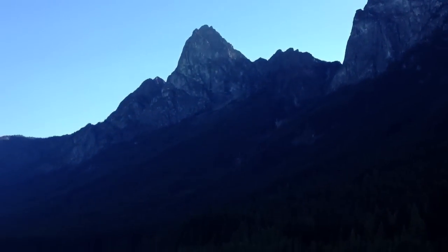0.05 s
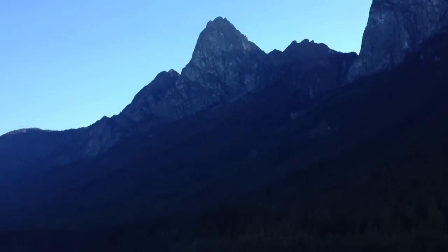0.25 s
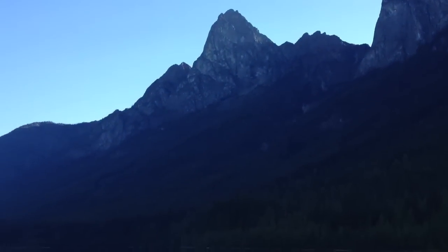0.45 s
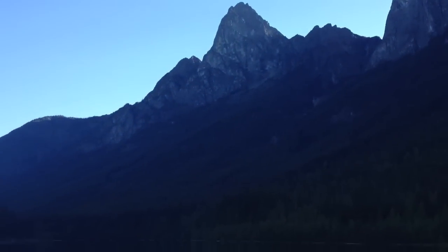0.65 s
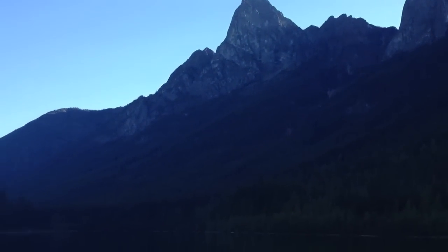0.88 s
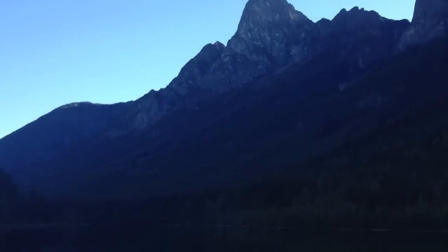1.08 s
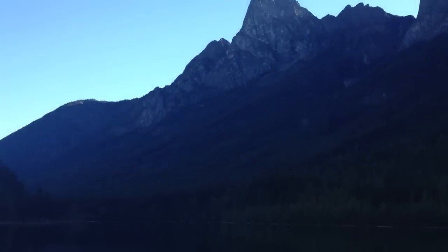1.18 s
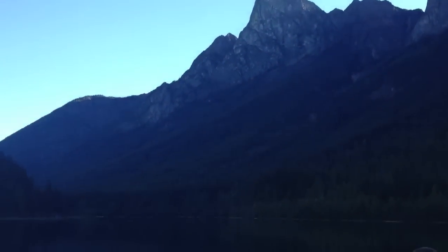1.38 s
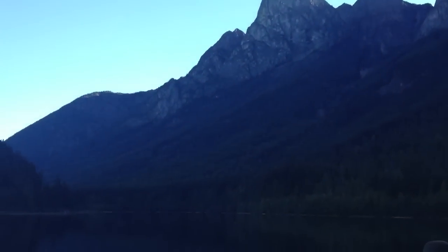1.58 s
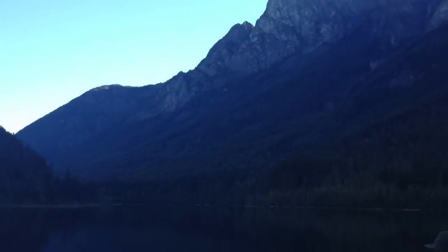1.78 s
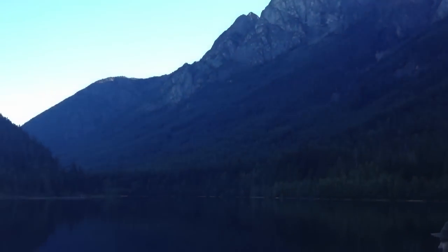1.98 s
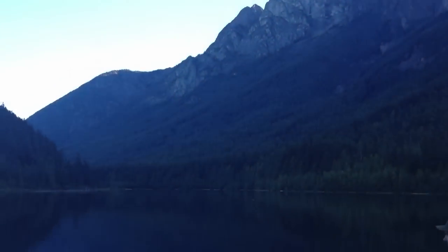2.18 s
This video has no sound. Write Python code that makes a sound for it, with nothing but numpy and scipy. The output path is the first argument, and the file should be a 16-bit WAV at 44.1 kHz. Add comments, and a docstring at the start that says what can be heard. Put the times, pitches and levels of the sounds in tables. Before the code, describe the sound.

A loon calls once across a mountain lake, sliding up at 0.2 seconds, quavering three times on a high, almost pure note and dropping away by 0.75. The shore echoes it immediately, and a faint, dull echo returns from about 1.1 seconds. Close by are tiny handling ticks, a soft swish around 1.6, one sharp click at 1.9 and faint rustles at 2.2. Quiet hiss continues throughout.

```python
"""A mountain lake, one microphone, a steady hiss of quiet air. Out on the water a loon gives one call:
the voice slides up, breaks into a high, almost pure register, quavers three times and drops back.
Trees on the shore echo it at once, the far slopes about a second later. Close to the microphone,
handling makes a few ticks and a soft swish; near the end come one sharp click and faint rustles."""
import sys
import numpy as np
from scipy import signal
from scipy.fft import rfft, irfft
from scipy.io import wavfile
from scipy.ndimage import uniform_filter1d

SR = 44100
rng = np.random.default_rng(int(sys.argv[2]) if len(sys.argv) > 2 else 0)


def wav_out(sig):
    """Save sig, one row per channel (or a flat mono array), as 16-bit PCM at SR to the path in sys.argv[1]."""
    wavfile.write(sys.argv[1], SR, np.round(np.clip(np.atleast_2d(sig).T, -1, 1) * 32767).astype(np.int16))


N = 99225  # 2.25 s


def undb(db):
    """Decibels to gain."""
    return 10 ** (np.asarray(db) / 20)


def wander(rate_hz):
    """Smooth random wander with a spread near 1."""
    hold = max(int(SR / rate_hz), 1)
    steps = np.repeat(rng.standard_normal(N // hold + 1), hold)
    return 1.32 * uniform_filter1d(uniform_filter1d(steps, hold), hold)[:N]


def noise(spectrum, tilt_db=0):
    """Noise of rms 1, shaped by (freq_hz, density_db) points and a tilt per octave."""
    hz, db = np.array(spectrum, float).T
    octave = np.log2(np.maximum(np.fft.rfftfreq(N, 1 / SR), 20))
    shape = undb(np.interp(octave, np.log2(hz), db) + tilt_db * octave)
    x = irfft(rfft(rng.standard_normal(N)) * shape, N)
    return x / x.std()


def glide(t, times, values):
    """Pass smoothly through the points, coming to rest at each crest and dip."""
    span, rise = np.maximum(np.diff(times), 1 / SR), np.diff(values)
    rate = rise / span
    gentler = np.minimum(abs(rate[:-1]), abs(rate[1:]))
    slope = np.r_[0, np.sign(rate[1:]) * gentler * (rate[:-1] * rate[1:] > 0), 0]
    i = np.clip(np.searchsorted(times, t) - 1, 0, len(span) - 1)
    u = np.clip((t - times[i]) / span[i], 0, 1)
    bend = span[i] * u * (1 - u) * ((1 - u) * slope[i] - u * slope[i + 1])
    return values[i] + rise[i] * u * u * (3 - 2 * u) + bend


def low_cut(x, hz):
    """Take away the bass below hz."""
    return signal.sosfilt(signal.butter(2, hz, "highpass", fs=SR, output="sos"), x)


# Quiet air and microphone hiss: freq_hz, density_db
HISS_SPECTRUM = [(30, -5), (60, -24), (125, -5), (210, 0.5), (330, -2), (520, -4), (850, -1.5), (1150, -4),
                 (1700, -5.5), (2700, -10), (4200, -7), (5200, -10), (7000, -10.5), (9500, -14.5),
                 (12500, -9), (15400, -12)]


def hiss(t, level_db=-68.5, flicker_db=0.5, fade_db_per_s=1):
    """The air over the lake and the microphone itself hiss throughout, easing very slightly."""
    gain = undb(level_db - flicker_db * wander(8.5) - fade_db_per_s * (t - t.mean()))
    return gain * noise(HISS_SPECTRUM)


# Throat resonances that colour the overtones: freq_hz, gain_db
THROAT_RESONANCES = [(1700, -1.5), (2000, -5.5), (2950, -18.5), (3350, 2), (3650, -3), (4150, 9.5),
                     (4600, -23), (5300, 11), (6000, -11), (8000, -8)]


def voice(t, course, harmonics_db, rough, jitter=0.0025, shimmer_db=0.7, flutter_db=1.2, waver_hz=251.4):
    """One register of the loon: a wavering tone whose overtones grow with effort and pass the throat."""
    times, hz, db = np.array(course, float).T
    pitch = glide(t, times, hz) * (1 + jitter * rough * wander(waver_hz))
    fullness = 1.27  # above 1, crests are broad and dips narrow
    effort = glide(t, times, undb(db) ** fullness) ** (1 / fullness)
    brightness = (effort / effort.max()) ** 0.49 * undb(flutter_db * wander(waver_hz))
    phase = 2 * np.pi * np.cumsum(pitch) / SR
    tone = undb(harmonics_db[0]) * np.sin(phase)
    for k, overtone_db in enumerate(harmonics_db[1:], 2):
        throat_db = np.interp(k * pitch, *np.array(THROAT_RESONANCES).T)
        tone += brightness * undb(overtone_db + throat_db) * np.sin(k * phase)
    sounding = uniform_filter1d(1. * ((t > times[0]) & (t < times[-1])), size=128)
    return tone * effort * sounding * undb(shimmer_db * rough * wander(waver_hz))


# Course of each part of the call, in order of entry: time_s, pitch_hz, level_db
OPENING_SLIDE = [(.183, 320, -64), (.197, 368, -57.5), (.214, 531, -52.5), (.222, 563, -52),
                 (.226, 600, -80)]
LOW_NOTE = [(.222, 752, -65), (.229, 773.4, -43), (.247, 745, -42.5), (.266, 687.6, -45.5),
            (.291, 799, -41.5), (.313, 834.5, -39.5), (.33, 822, -41.5), (.347, 758, -42), (.356, 786, -76)]
HIGH_QUAVER = [(.349, 990, -100), (.357, 986, -40.5), (.401, 1154, -30.5), (.445, 951.2, -43),
               (.492, 1140, -32), (.543, 935.5, -43.5), (.591, 1063, -36.5), (.632, 925, -45.5),
               (.648, 908, -93)]
SECOND_TONE = [(.352, 755, -51), (.395, 850, -69), (.445, 776, -74), (.49, 830, -76), (.545, 780, -81),
               (.588, 808, -56), (.612, 734, -63), (.628, 690, -72)]
VOICE_BREAK = [(.618, 420.1, -74), (.631, 346.3, -59), (.643, 325, -62), (.662, 363, -71)]
BREAK_SQUEAK = [(.622, 2560, -80), (.635, 2713, -62.5), (.649, 2780, -84)]
CLOSING_NOTE = [(.637, 695, -80), (.645, 667.7, -53), (.666, 645.6, -51), (.703, 660, -48.5),
                (.738, 618, -53), (.755, 604, -69)]
# Harmonics 1, 2, ... of each register at full effort, before the throat: gain_db
SLIDE_TIMBRE = [-11, 5, -1, -24.5]
LOW_TIMBRE = [2.5, -0.5, -25, -16.5, -30.5, -53]
HIGH_TIMBRE = [1, -24.5, -30, -59, -51, -56, -46]
BREAK_TIMBRE = [-2.5, 12, 4.5, -6.5, -14, -22, -14, -12]
CLOSING_TIMBRE = [1, -4.5, -21, -37, -20.5, -29.5]
# Air rushing through the throat: freq_hz, density_db
RASP_SPECTRUM = [(300, -34), (800, -5), (1600, 6), (2600, -4.5), (3500, -0.5), (5500, -0.5), (8000, -10.5),
                 (12000, -23)]


def loon(t, rasp_db=-69.5):
    """Out on the lake: clean notes, rough breaks, and a weak second tone and rasp under the high note."""
    held = (voice(t, LOW_NOTE, LOW_TIMBRE, rough=0.78)
            + voice(t, HIGH_QUAVER, HIGH_TIMBRE, rough=0.92)
            + voice(t, CLOSING_NOTE, CLOSING_TIMBRE, rough=1.9))
    breaks = (voice(t, OPENING_SLIDE, SLIDE_TIMBRE, rough=1.5)
              + voice(t, VOICE_BREAK, BREAK_TIMBRE, rough=7.7)
              + voice(t, BREAK_SQUEAK, [0], rough=2.3))
    undertone = voice(t, SECOND_TONE, [0, -14], rough=3.6)
    # the air keeps rushing even while the tone dips
    airflow = uniform_filter1d(1. * ((t > HIGH_QUAVER[0][0]) & (t < HIGH_QUAVER[-1][0])), size=2048)
    rasp = undb(rasp_db) * airflow * noise(RASP_SPECTRUM)
    return held + low_cut(breaks, hz=260) + undertone + rasp


# Reflections from the shore trees and the far slopes: delay_s, level_db
SHORE_TREES = [(.025, -18), (.11, -18.5), (.22, -24.5), (.38, -30), (.55, -38.5), (.8, -67)]
FAR_SLOPES = [(.88, -60), (.905, -19.5), (.95, -25), (1.04, -21.5), (1.16, -23.5), (1.299, -20),
              (1.441, -22), (1.62, -28.5), (1.9, -28)]


def echoes(t, call, top_hz=2900):
    """Countless dull reflections cross the lake, first from the shore and then from the mountainside."""
    delay, db = np.array(SHORE_TREES + FAR_SLOPES).T
    response = rng.standard_normal(N) / np.sqrt(SR) * undb(np.interp(t, delay, db)) * (t > delay[0])
    dull_call = signal.sosfilt(signal.butter(2, top_hz, fs=SR, output="sos"), call)
    return signal.fftconvolve(dull_call, response)[:N]


# Ticks and rustles at the microphone: peak_s, level_db, attack_s, decay_s, tilt_db_per_octave
FRICTION_BURSTS = [(.487, -54.5, .002, 0.0056, 6), (.630, -55, 0.0016, .003, -6.5),
                   (1.599, -61, 0.0028, 0.0067, 2.5), (2.203, -57, 0.0069, 0.016, -5),
                   (2.217, -56.5, .004, 0.0074, -4.5), (2.247, -62, 0.0075, 0.021, -4.5)]
# Colour of the rustles and of the swish: freq_hz, density_db
RUSTLE_SPECTRUM = [(80, -36), (280, -10), (600, -11), (1500, -6), (2500, -5.5), (4000, 5.5), (6000, 1),
                   (9500, -4.5), (13000, -0.5), (15500, -6.5)]
SWISH_SPECTRUM = [(120, -11), (290, 6.5), (600, -1.5), (1100, -5), (1480, 9.5), (1850, -5), (2300, -2),
                  (3200, -12), (4200, -6), (6000, -27), (13000, -19)]


def handling(t, swish_s=1.575, swish_width_s=0.16, swish_db=-68):
    """Right by the microphone, bursts of friction swell and die, with one soft swish among them."""
    ticks = np.zeros(N)
    for peak, db, attack, decay, tilt in FRICTION_BURSTS:
        envelope = np.exp(-(np.minimum(t - peak, 0) / attack) ** 2 - np.maximum(t - peak, 0) / decay)
        ticks += undb(db) * noise(RUSTLE_SPECTRUM, tilt) * envelope
    swell = np.exp(-((t - swish_s) / swish_width_s) ** 2)
    return ticks + undb(swish_db) * noise(SWISH_SPECTRUM) * swell


# Blows within the one sharp click: start_s, level_db, ring_time_factor
CLICK_BLOWS = [(1.8965, -42, 0.96), (1.899, -41.5, 0.6), (1.9003, -51, 1.5), (1.9054, -55, 1.4)]
# Modes of the small hard object: freq_hz, gain_db, t60_s
OBJECT_MODES = [(1243, -25, 0.019), (1605, -6.5, 0.029), (1910, -8, 0.011), (2220, -7, 0.017),
                (3166, -26, 0.011), (3815, -6, 0.0091), (4273, 1, 0.0085), (5250, -6, 0.016),
                (5230, -8.5, 0.014), (12400, -8, .011), (12700, -15, .011), (14200, -11, .011)]
# Noise of its parts scraping and striking: freq_hz, density_db
CRACK_SPECTRUM = [(300, -12), (1500, 13), (4200, -8), (7000, 0), (10000, -5), (12500, 5), (15500, -9)]


def click(t, scrape_db=-61, scrape_s=0.0033, crack_s=0.0027, mode_scatter=0.004):
    """Close by, a small hard thing snaps and chatters: each blow cracks and rings the same short modes."""
    # the parts slide just before they snap
    out = undb(scrape_db) * noise(CRACK_SPECTRUM) * np.exp(-((t - CLICK_BLOWS[0][0]) / scrape_s) ** 2)
    for start, db, ring_factor in CLICK_BLOWS:
        age = np.maximum(t - start, 0)
        ring = np.zeros(N)
        for hz, gain_db, t60 in OBJECT_MODES:
            pitch = hz * (1 + mode_scatter * rng.standard_normal())
            decay = np.exp(-np.log(1000) * age / (t60 * ring_factor))
            ring += undb(gain_db) * np.sin(2 * np.pi * pitch * age) * decay
        crack = noise(CRACK_SPECTRUM) * np.exp(-age / crack_s)
        out += undb(db) * (t >= start) * (ring + crack)
    return low_cut(out, hz=960)


def scene():
    """The call, its echoes, the small sounds close by and the hiss meet at one microphone."""
    t = np.arange(N) / SR
    call = loon(t)
    return (call + echoes(t, call) + click(t) + handling(t) + hiss(t))[None]


def record(dry, bass_hz=112, top_hz=15400):
    """The microphone thins the bass and the recorder cuts the top steeply."""
    top_cut = signal.ellip(10, .1, 70, top_hz, fs=SR, output="sos")
    return signal.sosfilt(top_cut, low_cut(dry, bass_hz))


dry = scene()
out = record(dry)
wav_out(out)
```